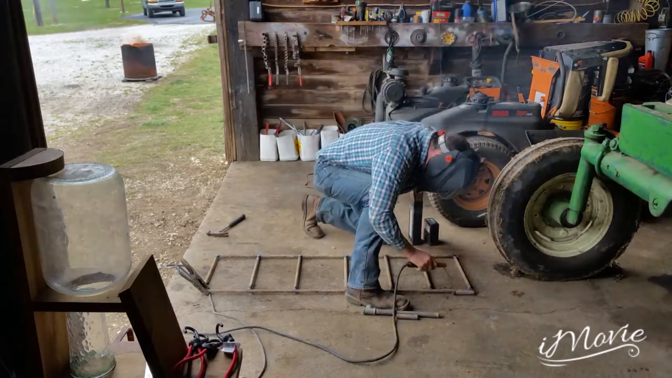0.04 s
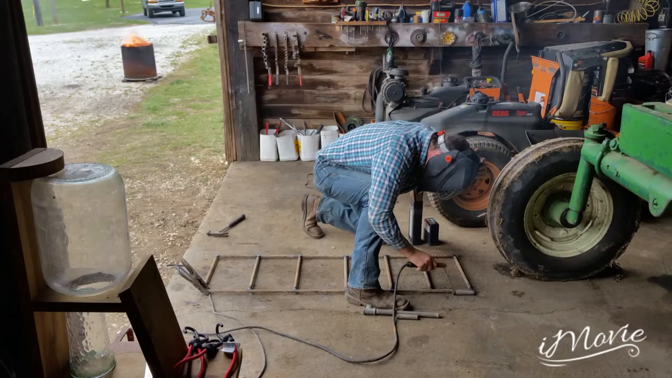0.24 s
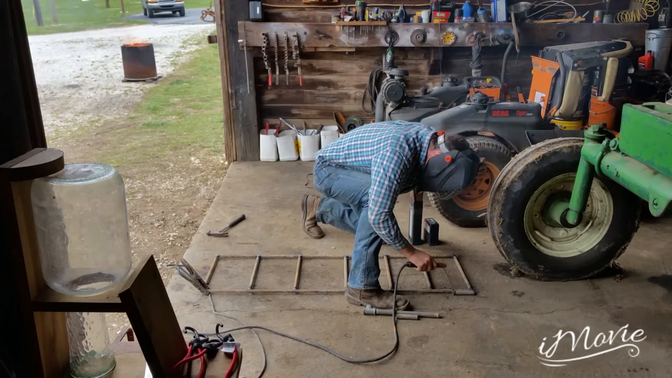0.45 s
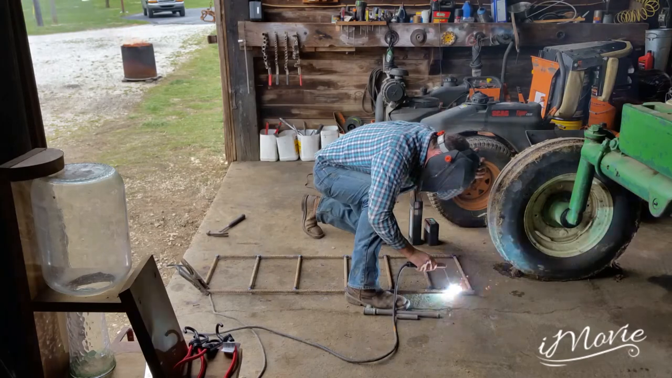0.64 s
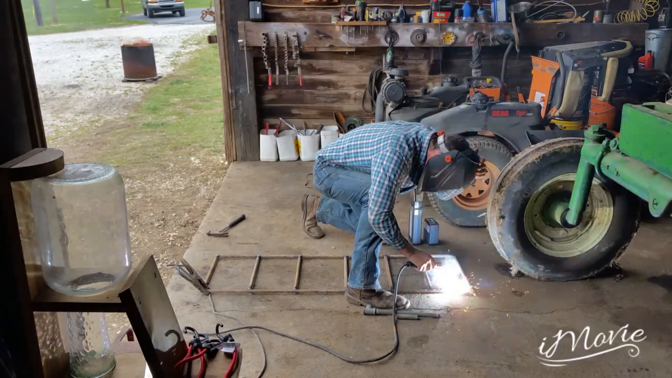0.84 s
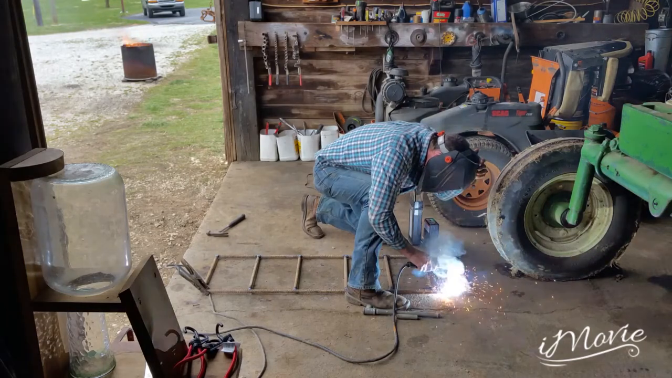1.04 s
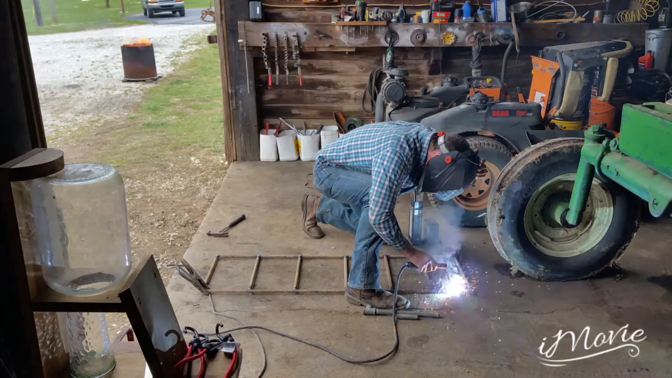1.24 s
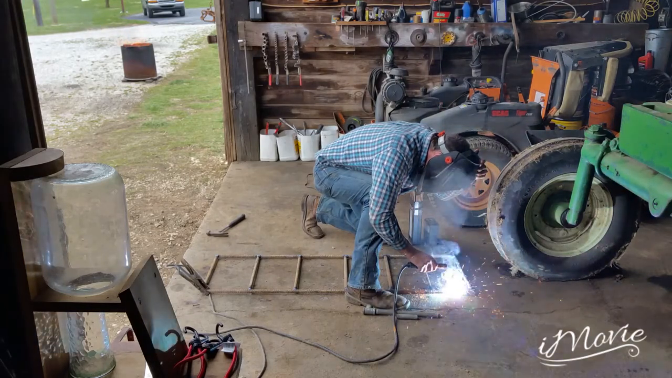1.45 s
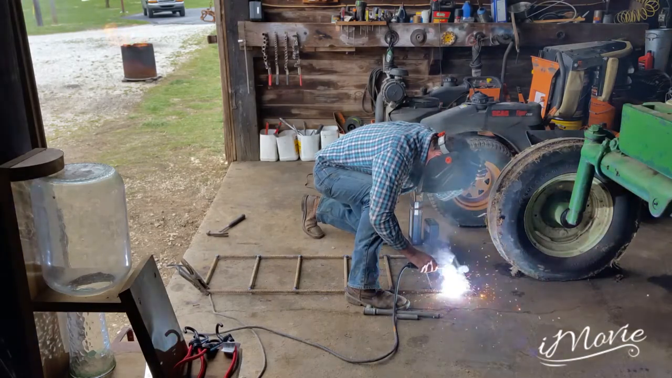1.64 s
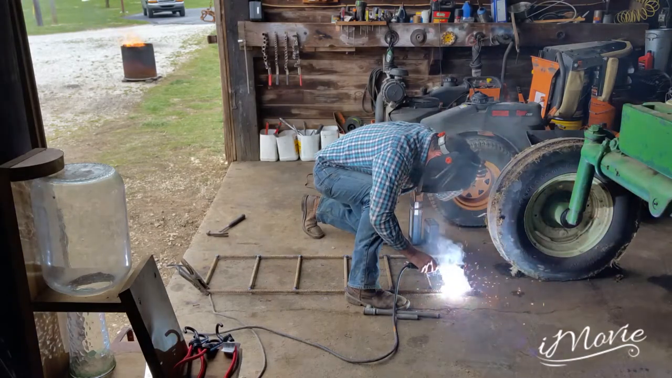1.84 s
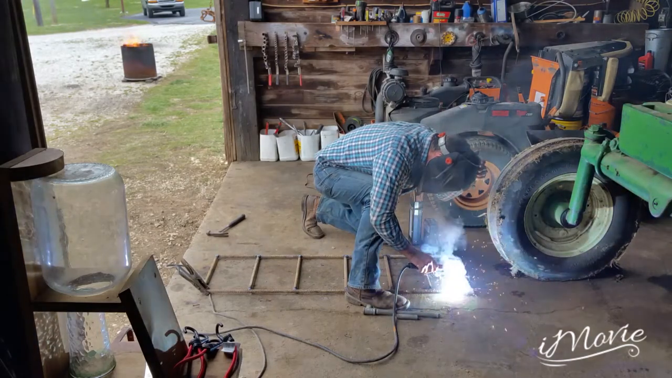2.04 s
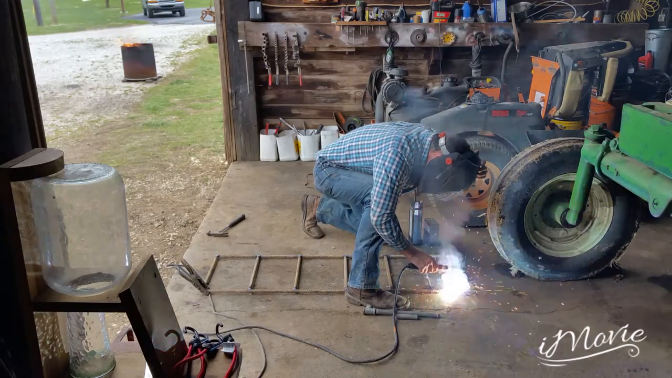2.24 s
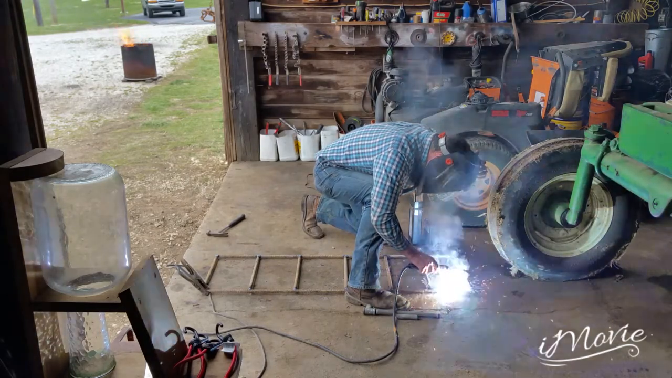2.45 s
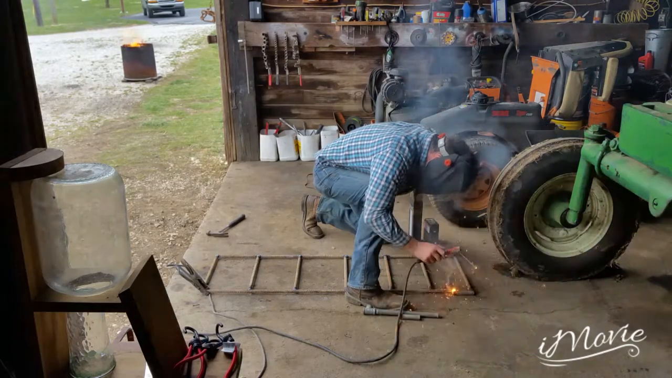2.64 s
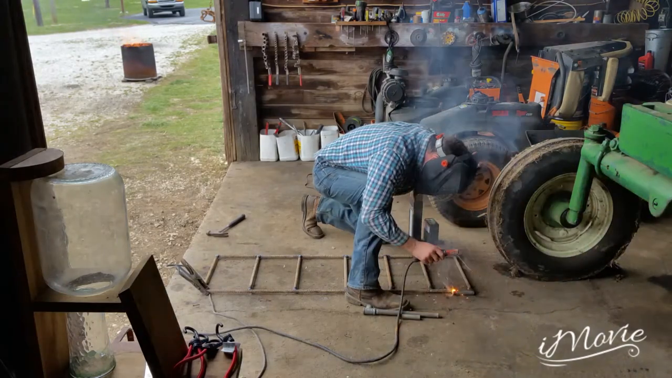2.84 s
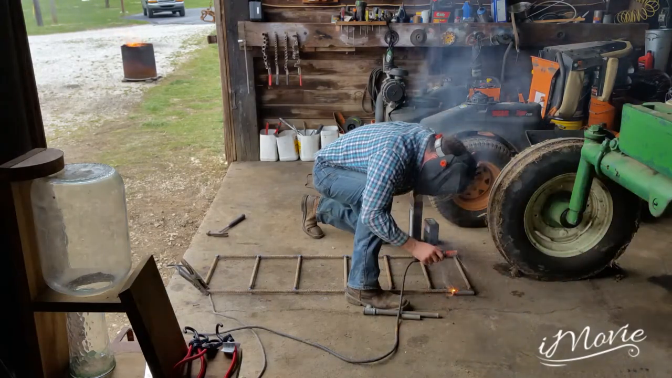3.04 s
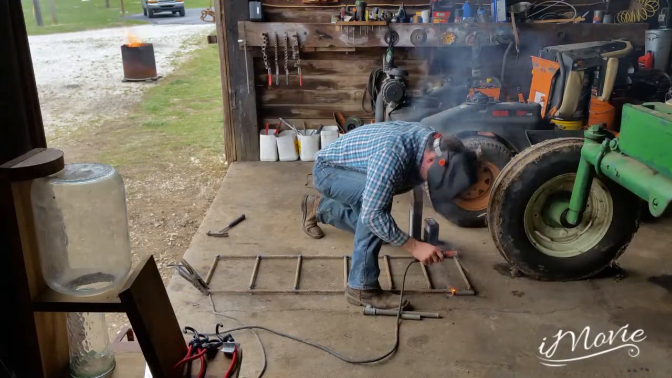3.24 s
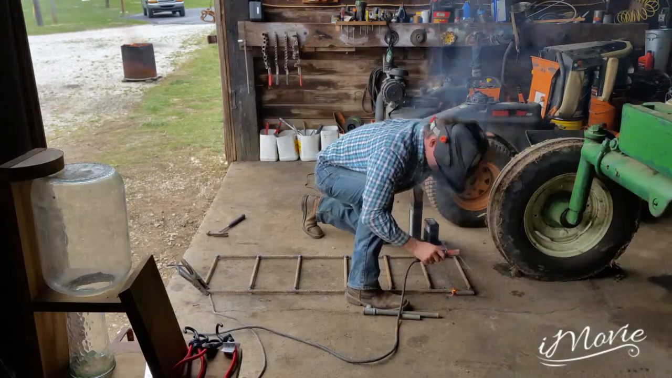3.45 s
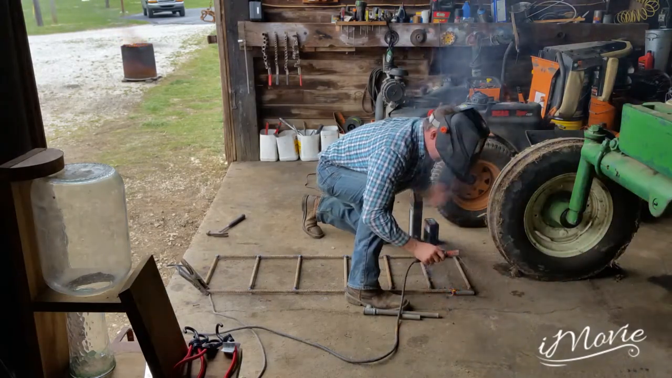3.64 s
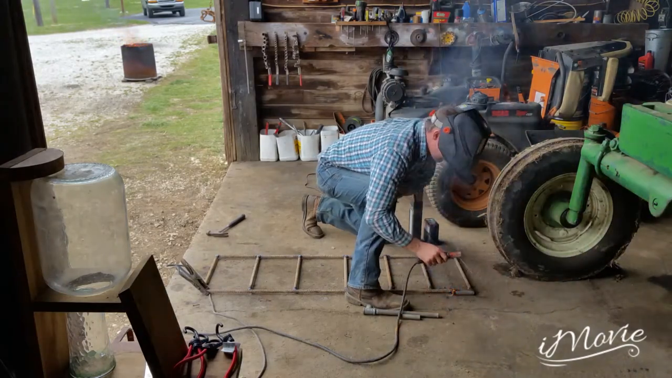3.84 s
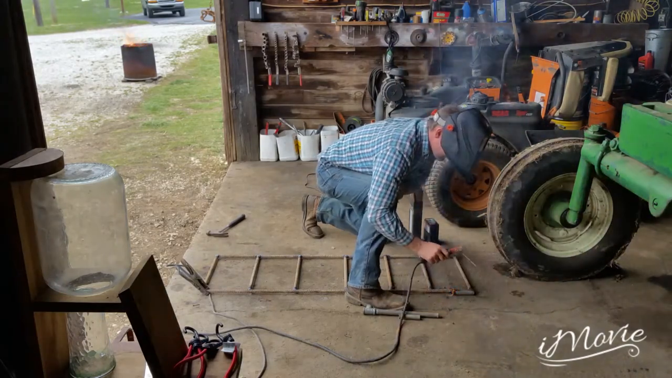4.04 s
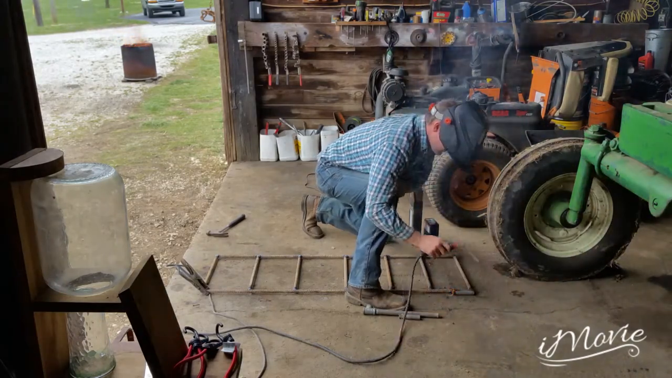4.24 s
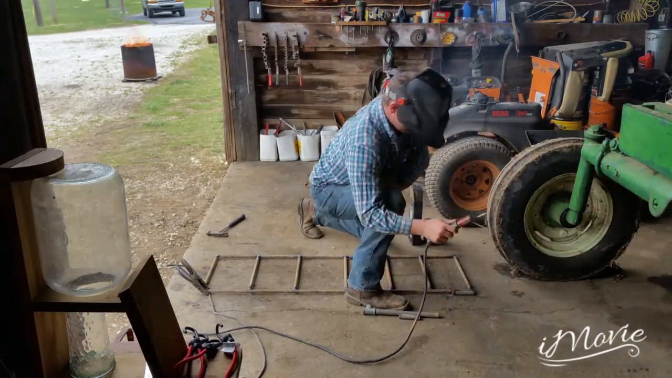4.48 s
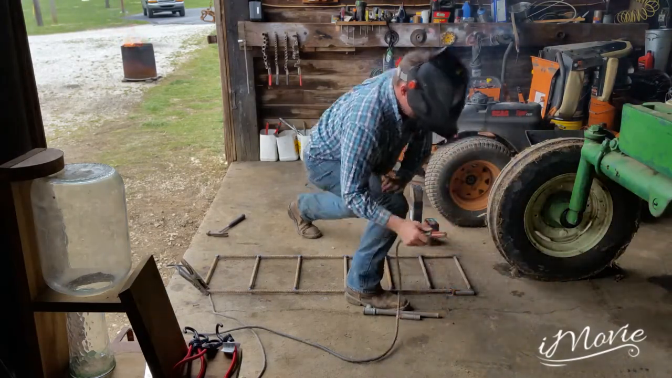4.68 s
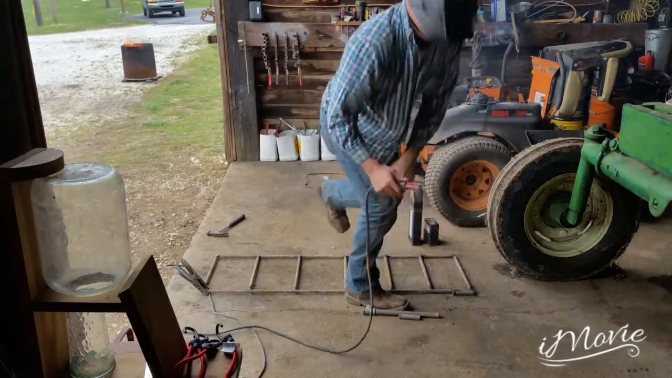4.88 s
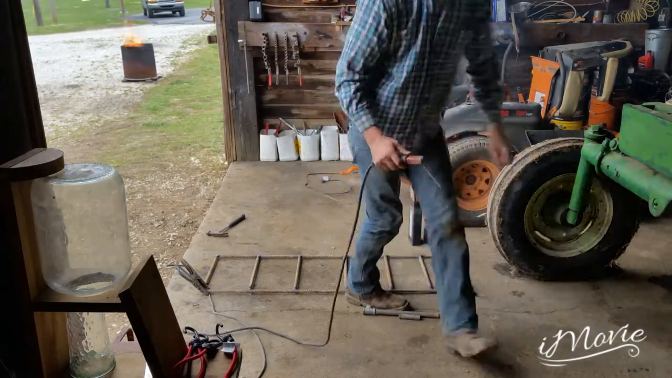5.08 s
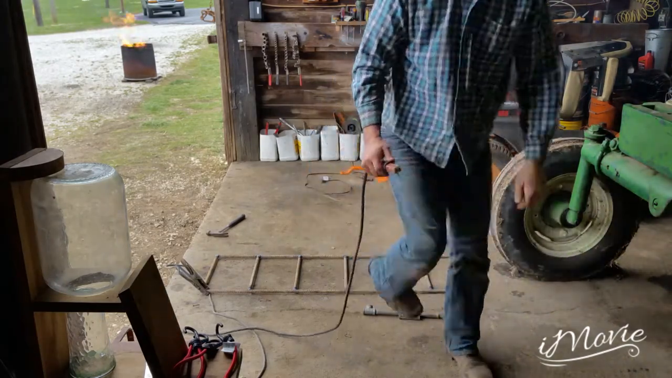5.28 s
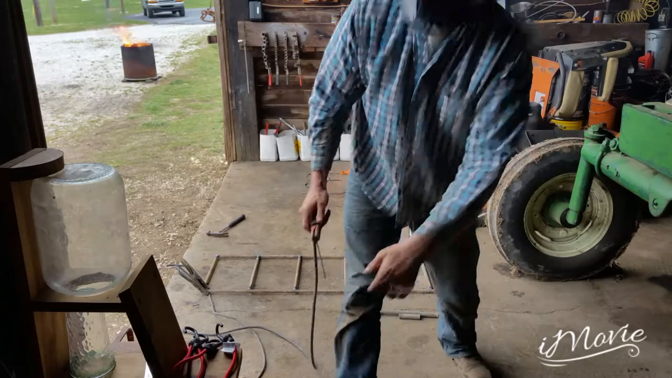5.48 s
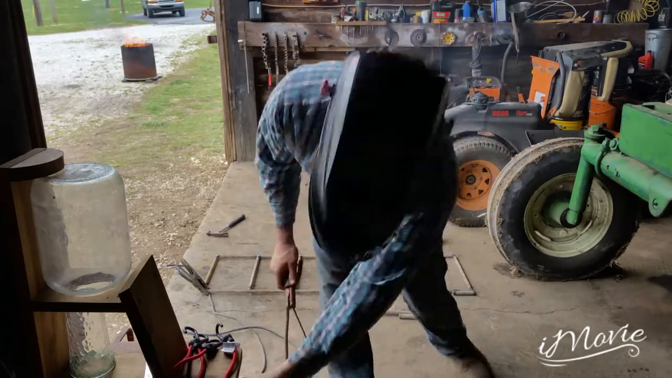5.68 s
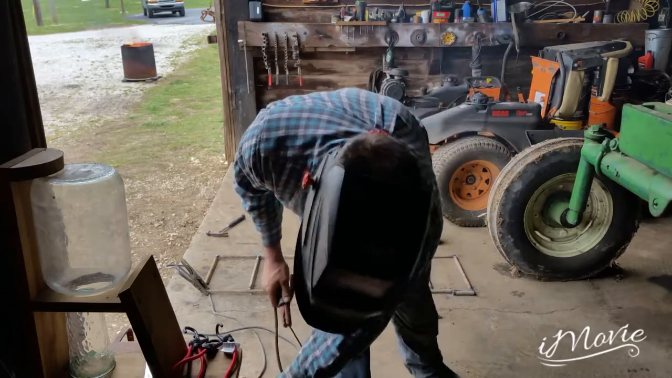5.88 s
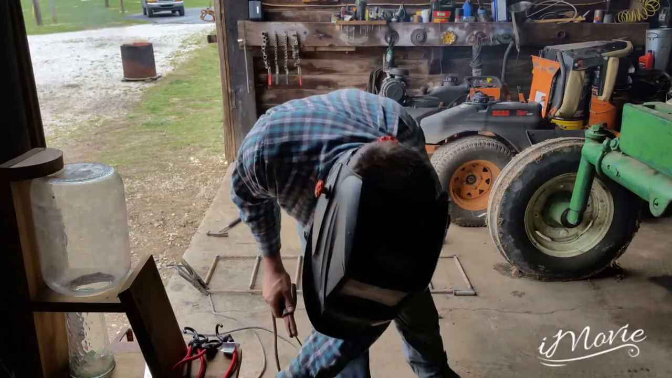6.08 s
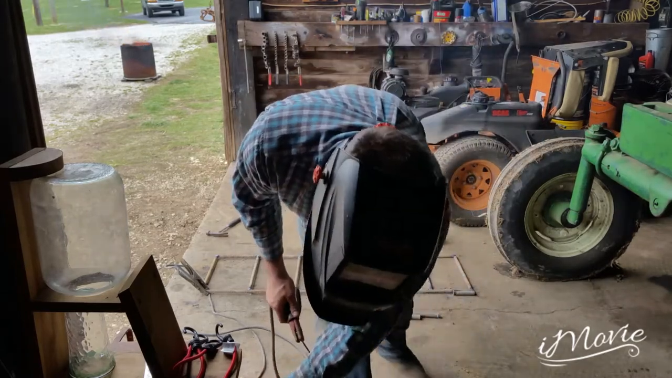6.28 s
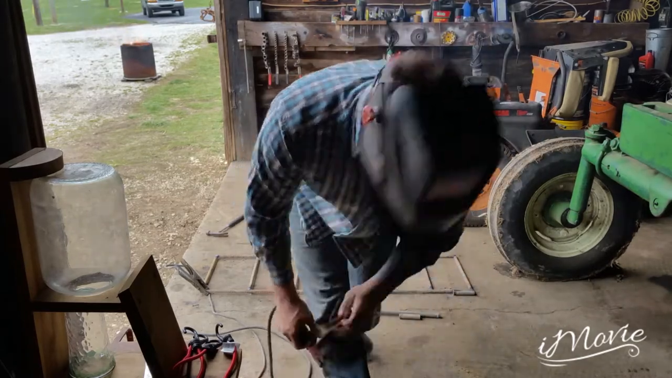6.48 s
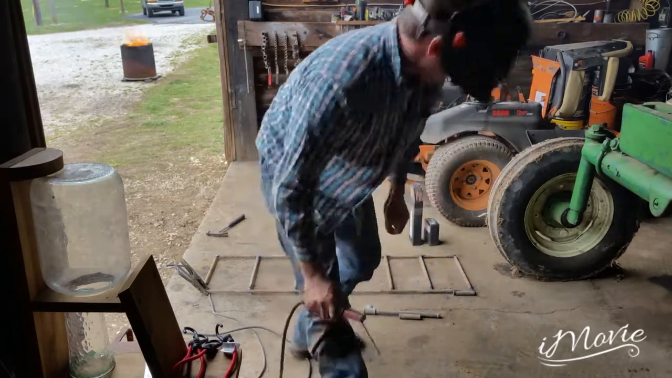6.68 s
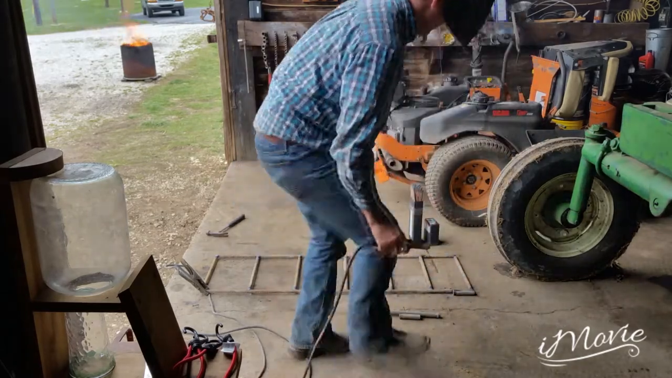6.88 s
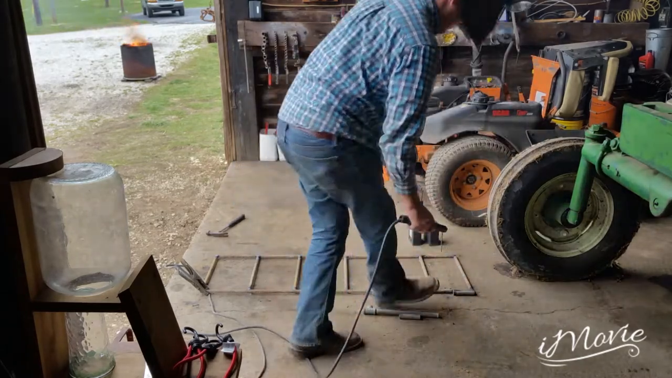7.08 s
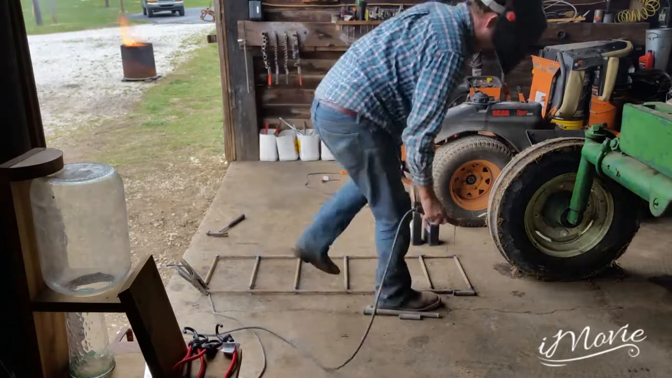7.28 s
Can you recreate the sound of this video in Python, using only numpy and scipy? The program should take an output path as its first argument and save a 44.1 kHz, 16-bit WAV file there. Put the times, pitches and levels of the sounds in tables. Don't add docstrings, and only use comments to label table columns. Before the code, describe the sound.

A fan-cooled welding machine hums steadily; an arc snaps on, sizzles and spits for two seconds, cuts off, then two hard metallic box knocks ring.

```python
import sys
import numpy as np
from scipy import signal
from scipy.fft import rfft, irfft, next_fast_len
from scipy.io import wavfile
from scipy.ndimage import uniform_filter1d, map_coordinates

SR = 44100
rng = np.random.default_rng(int(sys.argv[2]) if len(sys.argv) > 2 else 0)


def wrap_up_sound(samples):
    columns = np.atleast_2d(samples).T
    tamed = np.clip(columns, -1, 1)
    steps = np.round(tamed * 32767).astype(np.int16)
    wavfile.write(sys.argv[1], SR, steps)


def how_loud(loudness_db):
    steps = np.asarray(loudness_db, float) / 20
    return 10 ** steps


N = 322812

MAINS_HZ, BLADE_HZ = 60.01, 204.5
ARC_ON_S, ARC_OFF_S = 0.628, 2.506

# (pan [dB], left lead [rad])
HUM_PLACES = [
    (1, 0),
    (-5, 0),
    (-0.5, 0),
]
# (time [s], core hum level [dB], arc level [dB], arc length [0-1])
WELD = [
    (.63, -31.5, -33, 0.2),
    (.695, -34, -36, 0.2),
    (.71, -39.5, -33.5, 0),
    (.88, -35, -33.5, 0.3),
    (1.03, -36.5, -36.5, 0.6),
    (1.07, -36, -33, 0.96),
    (1.3, -41, -33, 0.83),
    (1.55, -35.5, -31, 0.64),
    (2.45, -37, -32.5, 0.73),
]
# (time [s], surge [dB], rise [s], fall [s])
SURGES = [
    (.65, -1, 0.018, .03),
    (.772, 9.5, 0.024, 0.025),
    (2.5, 12.5, 0.014, 0.016),
]
# (time [s], fan change [dB], hum change [dB])
MAN_MIRROR = [(0, .3, 0.5), (2.6, 0.75, 0), (3.4, 0, 0.5), (4.5, 0, 1), (5.1, 1, -1), (5.4, 0.8, -1),
              (5.7, 0, 1), (6.0, 0, -1), (6.2, 1.1, 1), (6.65, 0.4, 0.5), (7.32, .5, -1)]

# (time [s], speed lost [0-1])
FAN_SAG = [
    (0, 0),
    (.63, 0),
    (1, .0105),
    (2.5, .0112),
    (2.75, 0),
    (7.4, 0),
]
# (blade multiple, mains multiple added, level [dB], unsteadiness [dB], change under load [dB])
FAN_TONES = [
    (1, 0, -58, -1, -24),
    (2, 0, -43, 0.9, 4),
    (1, 8, -49, 2, -1.5),
    (4, 0, -48.5, 2.5, 0.5),
    (6, 0, -51.5, 3.5, 2.5),
]
# (pan [dB], left lead [rad])
FAN_PLACES = [
    (-1, -0.49),
    (8.5, 1.55),
    (9.5, -0.23),
    (-5, 1.35),
    (-7.5, 1.2),
]
# (frequency [Hz], density [dB per Hz])
FAN_AIR = [(18, -53), (30, -40), (49, -28.5), (156, -16.5), (232, -8), (344, -9), (402, -10.5), (612, -11),
           (680, -4.5), (1060, -15.5), (1240, -10.5), (2460, -18), (2800, -22), (13900, -32), (15800, -42)]
# (centre [Hz], width [Hz], lift [dB])
FAN_CASE = [(532, 97, 8), (685, 74, -1), (820, 120, 1.5), (1015, 52, 1.5), (1330, 330, 4.5),
            (1717, 95, 6.5), (2407, 270, 5.5), (3000, 74, 2), (3540, 330, 5.5), (4230, 140, 4),
            (4440, 220, -1.5), (5100, 420, 1.5), (6300, 1100, 3), (14300, 1600, -5.5)]
# (frequency [Hz], likeness [-1 to 1])
FAN_LIKENESS = [(30, 0.54), (70, 1), (250, 0.72), (700, 0.91), (1400, 0.64), (3000, 0.16), (5000, 0.046),
                (15000, 0.23)]

# (frequency [Hz], density [dB per Hz])
HISS = [(1500, -46), (3000, -15.5), (5000, -5), (8000, -1.5), (10000, -1.5), (12000, -1.5), (14000, -5.5),
        (15000, -13), (15800, -19)]
# (frequency [Hz], density [dB per Hz])
SIZZLE = [(900, -42), (1800, -11), (2500, -1.5), (3200, -1.5), (4200, -7), (6000, -5.5), (9000, -54)]
# (frequency [Hz], density [dB per Hz])
ROAR = [(60, -32), (130, 0), (250, 2.5), (400, 4), (700, 5), (1400, 2), (2000, -3), (3000, -10)]
# (centre [Hz], width [Hz], change [dB])
FRAME = [(1224, 97, 8.5), (1400, 140, 9), (1697, 115, 9.5), (1897, 160, 10.5), (3187, 160, 6.5),
         (3404, 130, -12), (3730, 320, 6.5), (4120, 157, -9.5), (5910, 170, -10.5), (6940, 160, 8),
         (7450, 240, -7), (9640, 190, -5), (10600, 510, 0.5), (13900, 400, -3)]
# (time [s], peak level [dB])
SPITS = [(0.6298, -16.5), (0.7041, -10), (0.845, -14.5), (0.9183, -15), (0.9594, -22), (1.0485, -17),
         (1.076, -23), (1.157, -17), (1.2266, -20), (1.2625, -9), (1.301, -15), (1.4758, -13.5),
         (1.516, -12), (1.567, -16), (1.6004, -13.5), (1.717, -13.5), (1.783, -14), (1.8084, -20),
         (1.8836, -9.5), (1.9014, -10.5), (2.0004, -11.5), (2.0351, -12), (2.0921, -11), (2.2326, -14),
         (2.2923, -13), (2.3084, -14.5), (2.3821, -14), (2.4247, -12), (2.45, -18), (2.4824, -15)]
# (time [s], peak level [dB])
POPS = [
    (.6355, -17),
    (.748, -15),
    (.768, -10),
    (0.773, -31),
    (.7815, -17),
    (.7895, -21),
    (2.4845, -9),
    (2.4975, -11),
    (2.5055, -10),
    (2.5142, -26),
]

# (time [s], level [dB], centre [Hz], width [octaves], length [s])
SCUFFS = [(2.867, -48, 9000, 1, .006), (3.216, -47, 9000, 1, .008), (4.796, -42, 3050, .03, 0.014),
          (4.835, -50, 5700, .04, .015), (4.9, -52, 5000, 1, .01), (5.19, -49, 3590, 0.028, 0.055),
          (5.203, -47.5, 4300, .15, 0.061), (5.195, -47, 9000, .8, 0.034), (5.4475, -35.5, 8000, 1.3, .005),
          (5.47, -66, 75, 0.46, 0.044), (5.818, -56, 10000, .8, .04), (6.018, -55, 55, 0.65, .04),
          (6.09, -50, 60, 1, .03), (6.19, -55, 55, .5, .04), (6.39, -67, 65, .3, 0.069),
          (6.397, -58, 3000, .05, .015), (7.19, -52, 12000, .6, .015)]
# (time [s], peak level [dB], rebound delay [s], rebound level [dB])
KNOCKS = [
    (5.947, -7.5, 0.02, -5),
    (6.099, -6.5, 0.018, -11),
]
# (frequency [Hz], level [dB], T60 [s])
BOX_MODES = [
    [(510, -4.5, 0.21), (733, -14.5, 0.28), (956, -8.5, 0.19), (1700, -33, 5.0), (2230, -12, 0.2),
     (2460, -5, 0.085), (2600, -30, 0.31), (3300, -13, 0.16), (3640, -2, 0.063), (4150, -25, 0.27),
     (4770, -24, 0.29)],
    [(710, -5, 0.12), (976, -7, 5.0), (1500, -16, 0.32), (1835, -11.5, 0.2), (1970, -13, 0.21),
     (2250, -8, 0.067), (2560, -7, 0.092), (3138, -22, 0.12), (3887, -8, 0.088), (3989, -25, 0.16),
     (4730, -20, 0.2)],
]
# (frequency [Hz], density [dB per Hz])
CLANG = [
    [(88, -36), (150, -17.5), (937, -10), (1820, -12), (2630, -9), (2960, -20), (3460, -3), (3960, -12),
     (13500, -18), (15800, -27)],
    [(88, -45), (150, -20.5), (955, -5), (1250, -12.5), (2250, -9.5), (2790, -12.5), (3810, -10.5),
     (4200, -13), (13500, -20), (15800, -34)],
]
# (frequency [Hz], T60 [s])
CLANG_T60 = [(100, 0.59), (500, 0.27), (2000, 0.18), (5000, .16), (12000, 0.1)]

# (frequency [Hz], T60 [s])
SHOP_T60 = [(200, 0.3), (2000, 0.15), (10000, 0.18)]
# (frequency [Hz], likeness [-1 to 1])
ROOM_LIKENESS = [(30, 0.62), (100, 1), (300, 0.91), (800, 0.82), (2000, 0.03), (5000, 0.19)]
# (frequency [Hz], left minus right [dB])
PORTS = [(100, 1), (400, 1.5), (700, 1.5), (1300, -1), (2400, 1), (4400, 1.5), (8000, -0.5), (10500, -1.5),
         (12500, -10), (14500, -23.5), (15500, -10)]


def unit(x):
    return x / np.sqrt(np.mean(x ** 2) + 1e-20)


def along(points, hz):
    f, v = np.transpose(points)
    return np.interp(np.log(hz + 1), np.log(f + 1), v)


def curves(rows):
    s, *cols = np.transpose(rows)
    return [np.interp(np.arange(N) / SR, s, c) for c in cols]


def wobble(rate):
    knots = rng.standard_normal(int(N * rate / SR) + 4)
    return map_coordinates(knots, [np.arange(N) * rate / SR])


def peaks(rows):
    t = np.arange(N) / SR
    return sum(height * np.exp(-.5 * ((t - s) / np.where(t < s, rise, fall)) ** 2)
               for s, height, rise, fall in rows)


def filtered(x, response):
    m = next_fast_len(x.shape[-1] + 8192)
    return irfft(rfft(x, m) * response(np.fft.rfftfreq(m, 1 / SR)), m)[..., :x.shape[-1]]


def bumps_db(modes, hz):
    return sum(db / (1 + (2 * (hz - c) / w) ** 2) for c, w, db in modes)


def tone(cycles, pan_db, lead):
    gain = how_loud([[pan_db / 2], [-pan_db / 2]])
    phase = np.array([[lead / 2], [-lead / 2]])
    return np.sqrt(2) * gain * np.sin(2 * np.pi * cycles + phase)


def pair(noises, likeness):
    def mid_side(hz):
        turn = np.arccos(np.clip(along(likeness, hz), -1, 1)) / 2
        return np.array([np.cos(turn), np.sin(turn)])

    mid, side = filtered(noises, mid_side)
    return np.array([mid + side, mid - side])


def tails(t60s, count):
    hz, t, z = signal.stft(rng.standard_normal((2, count)), SR, nperseg=128)
    decay = how_loud(-60 * t / along(t60s, hz)[:, None])
    tail = signal.istft(z * decay, SR, nperseg=128)[1][:, :count]
    return pair(tail / np.linalg.norm(tail[0]), ROOM_LIKENESS)


def lit_db():
    t = np.arange(N) / SR
    strike_db = 2000 * (t - ARC_ON_S - .007)
    fade_db = 750 * (ARC_OFF_S - t)
    return np.minimum(0, np.minimum(strike_db, fade_db))


def transformer():
    t = np.arange(N) / SR
    lag_s = 0.011
    current_db = curves(WELD)[0] + np.interp(t - lag_s, t, peaks(SURGES) + lit_db())
    cold = (1 - np.tanh((t - 1.24) / .04)) / 2
    cycles = 4 * MAINS_HZ * t
    idle_db, loaded_db = (-44, -45.5, -49.5), (1.5, -13.5, -10)
    cold_db, sway_db = (0.5, 8.5, 2.5), (.4, 1.2, 2.2)
    hum = 0
    for k, place in enumerate(HUM_PLACES):
        idle = how_loud(idle_db[k] + curves(MAN_MIRROR)[1]) * (1 - how_loud(lit_db()))
        loaded = how_loud(current_db + loaded_db[k] + cold_db[k] * cold)
        hum = hum + (idle + loaded) * how_loud(sway_db[k] * wobble(8.1)) * tone((k + 1) * cycles, *place)
    buzz = how_loud(-55 + lit_db() + 2.7 * wobble(6.5)) * cold * tone(cycles / 2, 0, 0)
    return hum + buzz


def fan():
    sag = curves(FAN_SAG)[0]
    blades = np.cumsum(BLADE_HZ * (1 - sag)) / SR
    mains = MAINS_HZ * np.arange(N) / SR
    tones = 0
    for (k, m, db, sway_db, load_db), place in zip(FAN_TONES, FAN_PLACES):
        level = how_loud(db + load_db * sag / sag.max() + sway_db * wobble(7))
        cycles = round(k) * blades + round(m) * mains + 0.033 * k * wobble(3.06)
        tones = tones + level * tone(cycles, *place)

    standing_db = 2.58 * rng.standard_normal(800)
    depth = [(300, 0.64), (600, 0.62), (2500, 0.69), (6000, 0.51)]

    def colour(hz):
        ripple_db = map_coordinates(standing_db, [hz / 28], mode="wrap") * along(depth, hz)
        lag = np.exp(1j * np.pi * hz / SR * 4.23 * np.array([[1], [-1]]))
        return how_loud(along(FAN_AIR, hz) + bumps_db(FAN_CASE, hz) + ripple_db) * lag

    air = filtered(pair(rng.standard_normal((2, N)), FAN_LIKENESS), colour)
    return tones + how_loud(-37 + 0.55 * wobble(6) + curves(MAN_MIRROR)[0]) * unit(air)


def plasma():
    _, arc_db, length = curves(WELD)
    choke_s = 0.0074
    choke_db = peaks([(s - choke_s / 2, 0.95 * max(db + 19, 0), choke_s, choke_s / 4) for s, db in SPITS])
    half = 2 * MAINS_HZ * np.arange(N) / SR
    strike_db = rng.standard_normal(int(half[-1]) + 2)[(half + .15).astype(int)]
    strike_db = uniform_filter1d(strike_db, 40)
    turn = 2 * np.pi * (half - .3)
    pulse_db = 4.5 * np.cos(turn) + 1.8 * np.cos(2 * turn)
    beat = how_loud(2.4 * np.tanh(strike_db) + pulse_db)
    sparks = (rng.random(N) < 1500 / SR) * how_loud(17 * rng.random(N) ** 2) * rng.choice([-1, 1], N)
    # spectrum, level over the arc dB, gain at full arc length dB, share of a surge, spark share
    layers = [(HISS, -0.5, 4, -.3, 1.2),
              (SIZZLE, 0.5, -3.5, 0.33, .9),
              (ROAR, -1.5, -7.5, .7, .3)]
    out = 0
    for spectrum, db, length_db, surge_share, spark_share in layers:
        level_db = arc_db + db + length_db * length + surge_share * peaks(SURGES) - choke_db + lit_db()
        noise = beat * (rng.standard_normal(N) + spark_share * unit(sparks))
        out = out + how_loud(level_db) * unit(filtered(noise, lambda hz: how_loud(along(spectrum, hz))))
    return out


def spits():
    out, u = np.zeros(N), np.arange(SR // 20) / SR
    fizz = how_loud(-60 * u / 0.015)
    crack = how_loud(3 - 60 * u / 0.0038)
    for (s, db), noise in zip(SPITS, rng.standard_normal((len(SPITS), len(u)))):
        spiky = 2 * np.tanh(noise * np.abs(noise) / 4)
        out[round(s * SR):][:len(u)] += how_loud(db + 3) * (fizz + crack) * spiky
    return filtered(out, lambda hz: how_loud(along(HISS, hz)) + 0.58 * how_loud(along(SIZZLE, hz)))


def arc():
    return filtered(plasma() + spits(), lambda hz: how_loud(bumps_db(FRAME, hz)))


def pops():
    def dip(u):
        return (u - u * u / 2) * np.exp(-u)

    out, t = np.zeros(N), np.arange(600) / SR
    shape = dip(t / 0.00013) + how_loud(-10) * dip(t / 0.00055)
    for s, db in POPS:
        out[round(s * SR):][:len(t)] -= how_loud(db + 13) * shape
    return filtered(out, lambda hz: (1j * hz / (130 + 1j * hz)) ** 2)


def scuffs():
    out = np.zeros(N)
    noises = rng.standard_normal((len(SCUFFS), SR // 5))
    for (s, db, centre_hz, octaves, length), noise in zip(SCUFFS, noises):
        puff = unit(filtered(noise, lambda hz: np.exp(-.5 * (np.log2((hz + 1) / centre_hz) / octaves) ** 2)))
        u = (np.arange(len(noise)) - len(noise) / 2) / SR
        start = round(s * SR) - len(noise) // 2
        out[start:][:len(u)] += how_loud(db) * puff * np.exp(-2 * (u / length) ** 2)
    return out


def knocks():
    out, t = np.zeros((2, N + SR)), np.arange(SR // 2) / SR
    attack = 1 - np.exp(-t / 0.0014)
    for (s, db, delay, rebound_db), modes, colour in zip(KNOCKS, BOX_MODES, CLANG):
        ring = sum(how_loud(level - 60 * t / min(t60, .3)) * np.sin(2 * np.pi * hz * t)
                   for hz, level, t60 in modes)
        clang = filtered(tails(CLANG_T60, len(t)), lambda hz: how_loud(along(colour, hz)))
        clang = clang / np.linalg.norm(clang[0])
        blow = attack * (how_loud(db - 8.5) * ring + how_loud(db + 22) * clang)

        def rebound(hz):
            return 1 + how_loud(rebound_db) * np.exp(-2j * np.pi * hz * delay) / (1 + (hz / 1500) ** 2)

        out[:, round(s * SR) - 40:][:, :len(t)] += filtered(blow, rebound)
    return out[:, :N]


def heard(x, lead, wet_db):
    ears = np.array([[lead], [-lead]])
    direct = filtered(x, lambda hz: np.exp(1j * np.pi * hz / SR * ears))
    place = 2 * np.pi * np.arange(N) / SR / 1.562
    answer = 0
    for k in range(3):
        send = x * np.cos(place + k * np.pi / 3) * np.sqrt(2 / 3)
        send = np.pad(send, (130, 0))[None]
        answer = answer + signal.fftconvolve(send, tails(SHOP_T60, SR // 3), axes=1)[:, :N]
    return (direct + how_loud(wet_db) * answer) / np.sqrt(1 + how_loud(2 * wet_db))


def scene():
    machine = transformer() + fan()
    weld = heard(arc() + pops(), lead=-2.27, wet_db=-0.5)
    man = heard(scuffs(), lead=1.0, wet_db=-8) + knocks()
    return machine + weld + man


def roll_off(x):
    return signal.sosfilt(signal.butter(12, 16630, fs=SR, output="sos"), x)


def record(dry):
    def ports(hz):
        balance_db = along(PORTS, hz) * np.array([[.5], [-.5]])
        return how_loud(balance_db - 120 * (hz > 15720))

    mix = filtered(dry, ports) - .0006
    return roll_off(mix)


dry = scene()
out = record(dry)
wrap_up_sound(out)
```